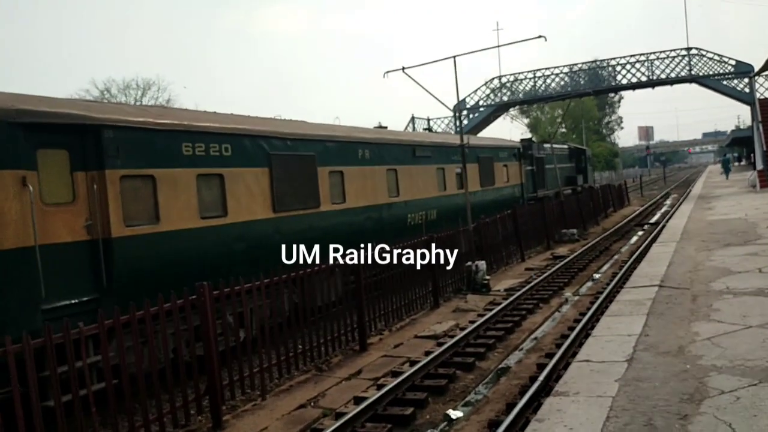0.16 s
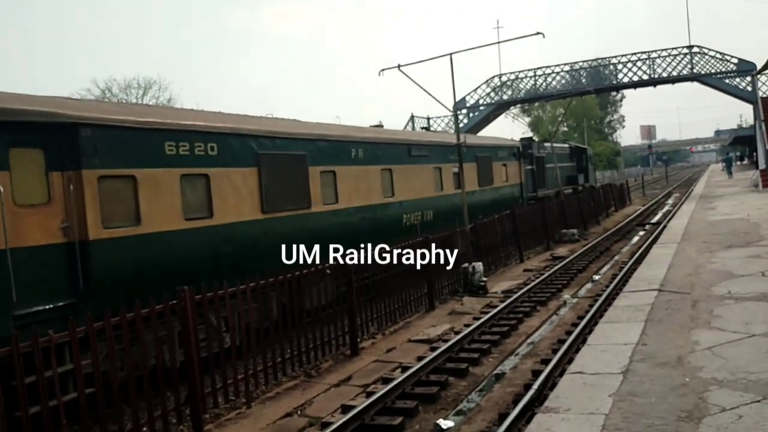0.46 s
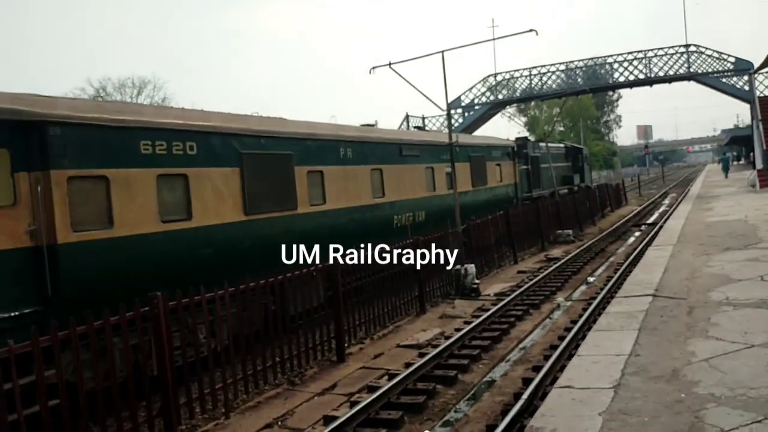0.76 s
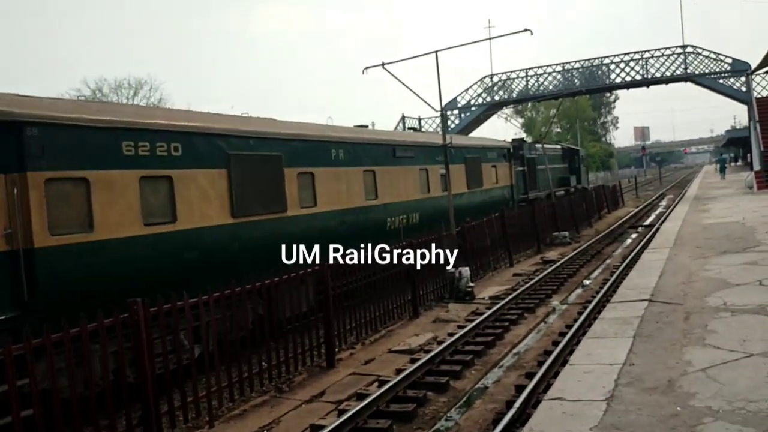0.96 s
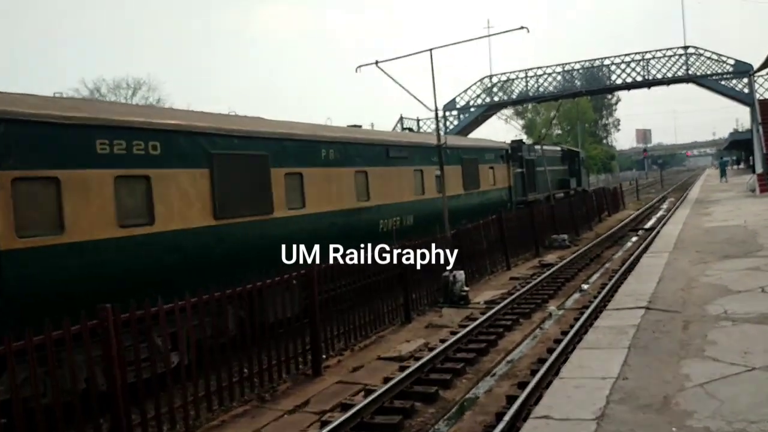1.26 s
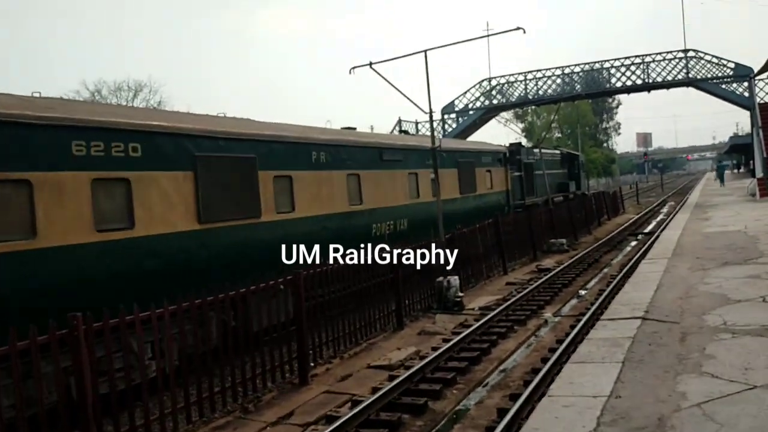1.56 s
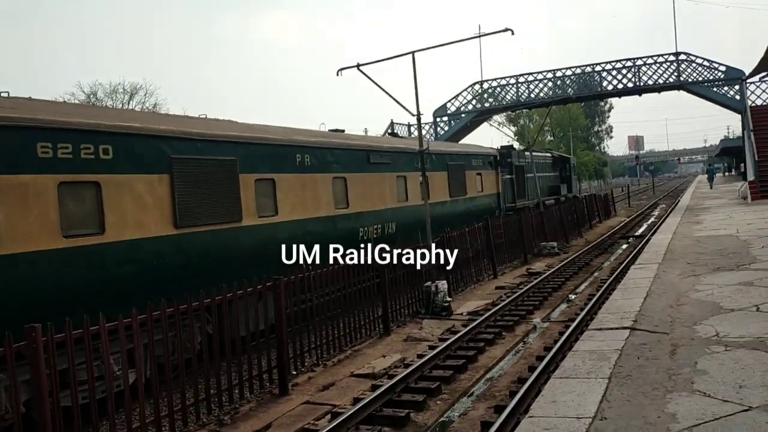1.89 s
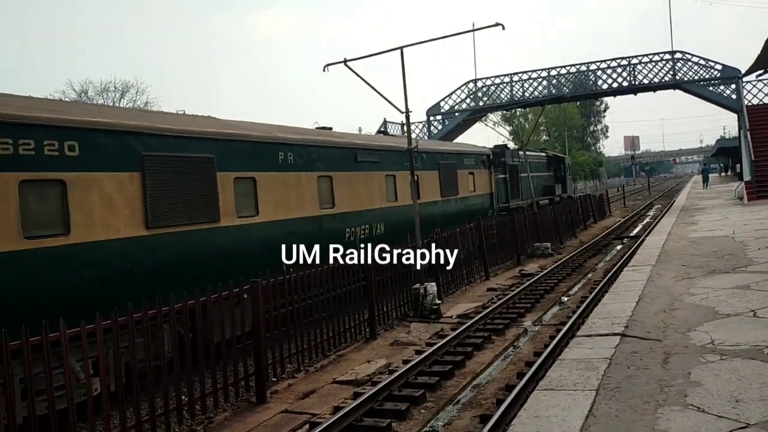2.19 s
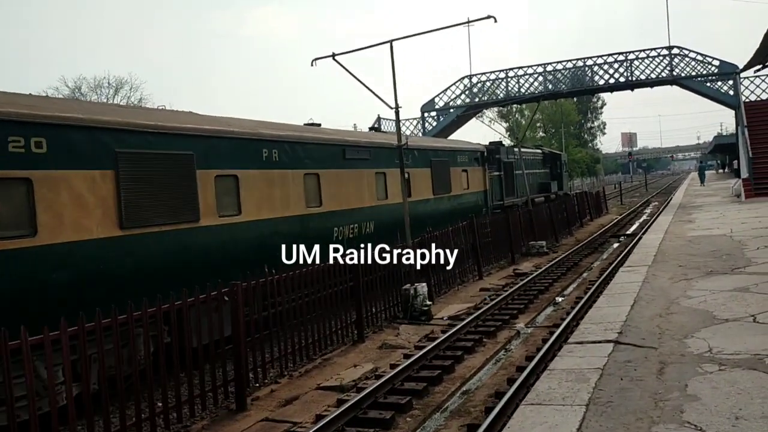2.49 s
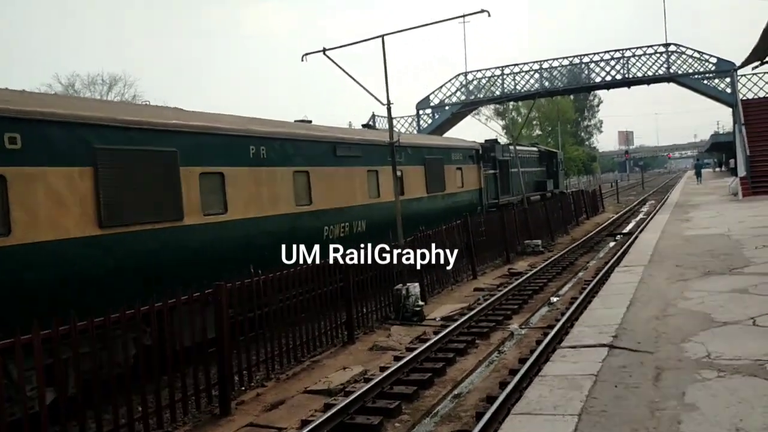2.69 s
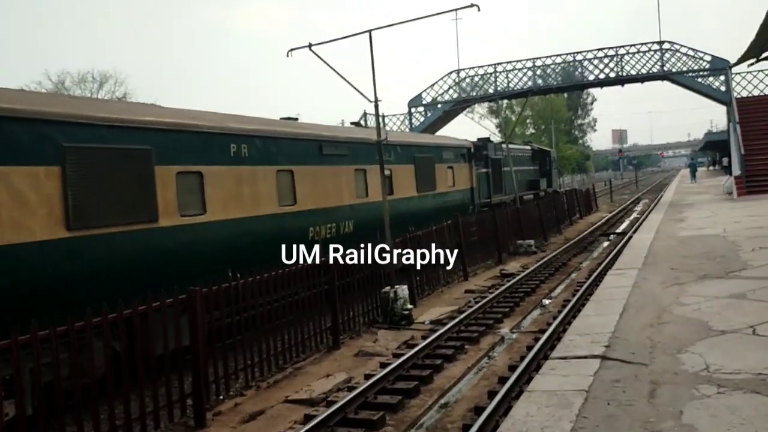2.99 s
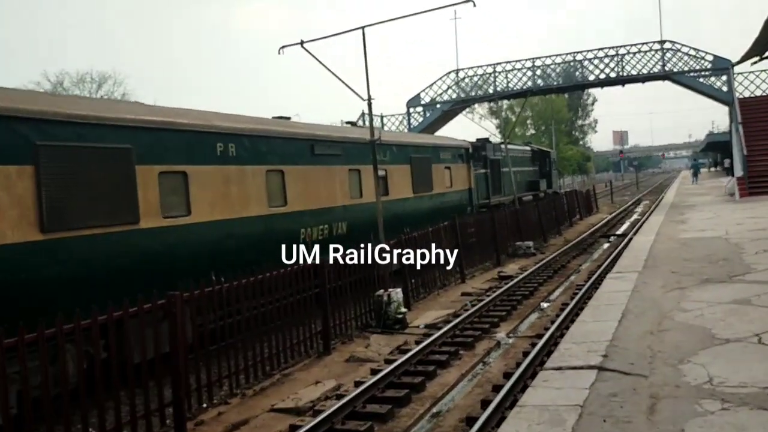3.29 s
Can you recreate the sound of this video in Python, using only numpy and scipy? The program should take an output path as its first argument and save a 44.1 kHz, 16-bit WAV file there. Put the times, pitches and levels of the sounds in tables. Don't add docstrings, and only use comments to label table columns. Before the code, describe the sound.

A diesel generator drones steadily with a low hum, rough roar and dull mechanical clatter.

```python
import sys
import numpy as np
from scipy import signal
from scipy.fft import rfft, irfft
from scipy.io import wavfile

SR = 44100
rng = np.random.default_rng(int(sys.argv[2]) if len(sys.argv) > 2 else 0)


def gain_from_decibels(decibels):
    exponent = np.asarray(decibels, float) / 20
    return 10 ** exponent


def generate_wav(signal):
    frames = np.transpose(np.atleast_2d(signal))
    scaled = np.clip(frames, -1, 1) * 32767
    pcm = np.round(scaled).astype(np.int16)
    wavfile.write(sys.argv[1], SR, pcm)


N = 152145
TIME = np.arange(N) / SR


def in_time(rows):
    s, *columns = np.transpose(rows)
    return [np.interp(TIME, s, column) for column in columns]


def rms_one(x):
    return x / np.sqrt(np.mean(x ** 2) + 1e-20)


def drift(rate):
    decimation = 40
    pole = np.exp(-2 * np.pi * rate * decimation / SR)
    white = rng.standard_normal(N // decimation + 4002)
    slow = signal.lfilter([1], [1, -2 * pole, pole * pole], white)[4000:]
    slow = rms_one(slow - slow.mean())
    return np.interp(np.arange(N) / decimation, np.arange(len(slow)), slow)


def bands(x, spectrum, patchy_db, rate):
    hz, db = np.transpose(spectrum)
    octave = np.log2(np.maximum(np.arange(N // 2 + 1) * SR / N, 1))
    shaped = rfft(x) * gain_from_decibels(np.interp(octave, np.log2(hz), db, left=-80, right=-80))
    shaped /= np.sqrt(2 * np.sum(np.abs(shaped) ** 2)) / N
    together = drift(rate / 4)
    parts = []
    for centre in np.arange(np.log2(hz[0]), np.log2(hz[-1]) + .5, .5):
        flicker = gain_from_decibels(patchy_db * (together + drift(rate)))
        window = np.clip(1 - 2 * np.abs(octave - centre), 0, 1)
        parts.append((2 ** centre, flicker * irfft(shaped * window, N)))
    return parts


# (time [s], drone level [dB], hum level [dB])
DRONE = [(0, -23, -34), (.4, -22.5, -29), (.9, -24, -34.5), (1.3, -25, -35), (1.6, -21, -30.5),
         (1.85, -19, -44.5), (2.15, -24.5, -34), (2.4, -29.5, -35), (2.65, -32, -44), (2.9, -25.5, -39.5),
         (3.45, -27, -40)]
# (multiple of cycle rate, level at start [dB], at one third [dB],
# at two thirds [dB], at end [dB])
ENGINE_ORDERS = [(6, -48, -46, -38, -42), (7, -45, -48, -47.5, -44.5), (8, -43, -38, -41, -51),
                 (10, -45, -47, -45, -43), (14, -44, -38.5, -32, -50), (15, -34, -34.5, -36, -35),
                 (34, -57, -49, -46.5, -36), (36, -46, -37, -40.5, -39), (39, -48, -38, -36, -38.5),
                 (42, -53, -42.5, -48.5, -59), (58, -52, -53, -55, -52), (62.4, -49, -48.5, -50, -52),
                 (63.66, -46, -49, -55.5, -51), (67.48, -43.5, -46.5, -51, -58),
                 (75.1, -52.5, -51.5, -48.5, -47.5), (77.85, -57, -46.5, -49, -37),
                 (82.3, -51, -49.5, -46, -55), (83.5, -54, -45.5, -45.5, -54),
                 (101.6, -45.5, -53, -54, -35.5), (110.6, -63, -58, -47, -37.5)]


def exhaust(cycles):
    main_tones = np.sin(2 * np.pi * np.outer((12, 26), cycles))
    out = (gain_from_decibels(np.array(in_time(DRONE))) * main_tones).sum(axis=0)
    for multiple, *db in ENGINE_ORDERS:
        level = np.interp(np.arange(N), np.linspace(0, N, len(db)), db)
        level = level + 1.2 * drift(1.6)
        out += gain_from_decibels(level) * np.sin(2 * np.pi * (round(multiple) * cycles + rng.random()))
    return np.sqrt(2) * out


FAN_HZ = (203.4, 207.83)
# (time [s], first fan level [dB], second fan level [dB])
FANS = [(0, -46, -40), (.5, -32.5, -44), (.9, -31.5, -35.5), (1.4, -40.5, -22.5), (1.7, -24, -27),
        (1.93, -20.5, -28), (2.15, -28, -25), (2.45, -49, -28), (2.65, -44, -30), (2.8, -38, -26.5),
        (2.95, -34, -34.5), (3.45, -46, -32)]


def fans():
    in_step_s, overtone_db = 1.93, -13.5
    phase = 2 * np.pi * np.outer(FAN_HZ, TIME - in_step_s)
    level = gain_from_decibels(np.array(in_time(FANS)))
    fundamentals = (level * np.sin(phase)).sum(axis=0)
    overtone = gain_from_decibels(overtone_db) * level[1] * np.sin(2 * phase[1])
    return np.sqrt(2) * (fundamentals + overtone)


# (frequency [Hz], density [dB per Hz])
ROAR = [(40, -34), (62, -34.5), (72, -16.5), (130, -8), (185, -1.5), (228, -8), (300, -6.5), (620, -26)]


def roar():
    level_db, swell_db, swell_s, swell_width_s = -25, 2, 1.85, 0.11
    fade_db, fade_above_hz = 0.5, 220
    swell = swell_db * np.exp(-((TIME - swell_s) / swell_width_s) ** 2)
    fade = gain_from_decibels(fade_db * np.linspace(-1, 1, N))
    parts = bands(rng.standard_normal(N), ROAR, patchy_db=1.0, rate=4.5)
    total = sum(band * (fade if hz > fade_above_hz else 1) for hz, band in parts)
    return gain_from_decibels(level_db + swell) * total


CYCLE_HZ = 12.53
# (time [s], clatter level [dB])
FACING = [
    (0.0, -31.5),
    (0.06, -33),
    (1.58, -31.5),
    (1.75, -28.5),
    (1.95, -30),
    (2.79, -29),
    (2.8, -27),
    (3.45, -27.5),
]
# (frequency [Hz], density [dB per Hz])
CLATTER = [(330, -4), (480, -1), (680, -4.5), (1050, 0.5), (1600, -2.5), (3450, -15), (4000, -32),
           (4800, -42)]
# (frequency [Hz], width [Hz], lift [linear gain])
PANELS = [(1594, 76, 0.33), (2030, 160, 0.41)]


def repeated_impacts(cycles):
    steps = int(SR / CYCLE_HZ)
    position = cycles % 1 * steps
    patterns = rng.standard_normal((2, steps))
    first, second = (np.interp(position, np.arange(steps), p, period=steps) for p in patterns)
    blend = np.pi / 2 * np.arange(N) / N
    pattern = rms_one(np.cos(blend) * first + np.sin(blend) * second)
    return signal.lfilter(*signal.butter(2, 2100, fs=SR), pattern)


def clatter(cycles):
    repeat_db, knock_depth = -7.0, 0.09
    edge_hz, edge_follows = 3200, 0.53
    repeated = repeated_impacts(cycles)
    knocks = 1 + knock_depth * np.cos(2 * np.pi * 6 * cycles)
    x = rng.standard_normal(N) * knocks + gain_from_decibels(repeat_db) * repeated
    x = x + sum(lift * signal.lfilter(*signal.iirpeak(hz, hz / width, fs=SR), x)
                for hz, width, lift in PANELS)
    facing, = in_time(FACING)
    swing = facing - facing.mean()
    parts = bands(x, CLATTER, patchy_db=0.4, rate=2.5)
    total = sum(gain_from_decibels(swing * (edge_follows if hz > edge_hz else 1)) * band for hz, band in parts)
    return gain_from_decibels(facing.mean() + 1.5) * total


# (frequency [Hz], density [dB per Hz])
HISS = [(3500, -6), (4300, -5), (5600, 1), (7500, 1), (8900, -12), (11500, -15.5), (14800, -8.5),
        (16000, -6.5)]
# (time [s], lift [dB], half length [s], extra brightness [dB])
GUSTS = [(0.096, 3.5, 0.12, 1), (0.585, 3, 0.055, 1.5), (0.758, 2.5, .04, 2.5), (0.95, 0, 0.034, -0.5),
         (1.172, 0, .06, 2.5), (1.751, 2, .05, 1), (1.953, 4, .09, -0.5), (2.168, 3, 0.071, 0),
         (2.303, 2.5, 0.033, 3.5), (2.6, 1, 0.15, 1), (2.866, 3, 0.1, 1.5), (3.204, 0, .1, 1)]


def hiss():
    level_db, follows, top_hz = -54, 0.81, 8500
    facing, = in_time(FACING)
    s, lift_db, half_s, bright_db = np.transpose(GUSTS)[:, :, None]
    gust = np.exp(-((TIME - s) / half_s) ** 4)
    level = follows * (facing - facing.mean()) + (lift_db * gust).sum(axis=0)
    bright = (bright_db * gust).sum(axis=0)
    parts = bands(rng.standard_normal(N), HISS, patchy_db=.5, rate=20.0)
    total = sum(gain_from_decibels(bright if hz > top_hz else 0) * band for hz, band in parts)
    return gain_from_decibels(level_db + level) * total


def scene():
    speed = 1 + .0002 * drift(.5)
    cycles = np.cumsum(CYCLE_HZ * speed) / SR
    return (exhaust(cycles) + fans() + roar() + clatter(cycles) + hiss())[None]


def band_limit(x):
    return signal.sosfilt(signal.butter(12, 15490, fs=SR, output="sos"), x)


def record(dry):
    notch_hz, notch_width_hz = 7900, 120
    dipped = signal.lfilter(*signal.iirnotch(notch_hz, notch_hz / notch_width_hz, fs=SR), dry)
    return band_limit(0.71 * dipped + 0.21 * dry)


dry = scene()
out = record(dry)
generate_wav(out)
```